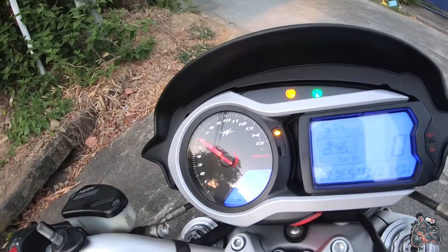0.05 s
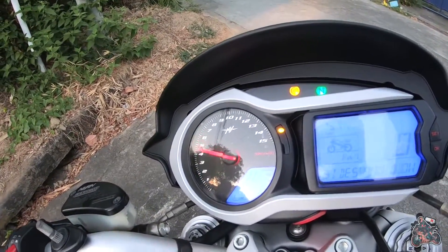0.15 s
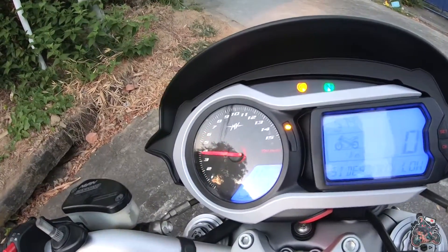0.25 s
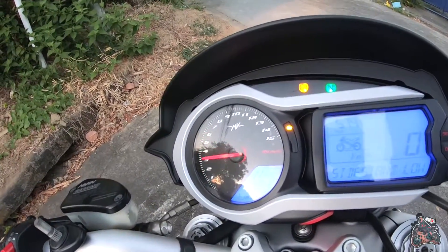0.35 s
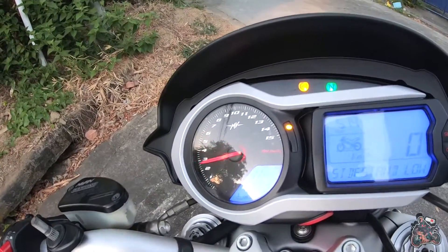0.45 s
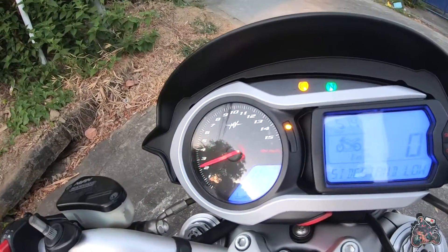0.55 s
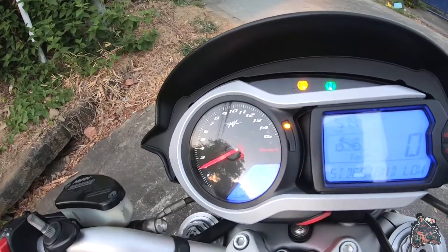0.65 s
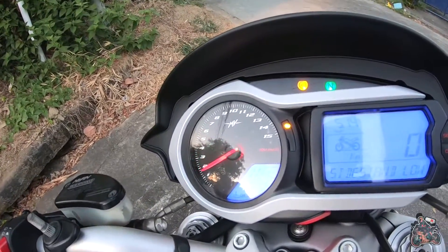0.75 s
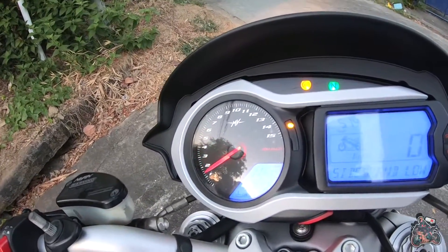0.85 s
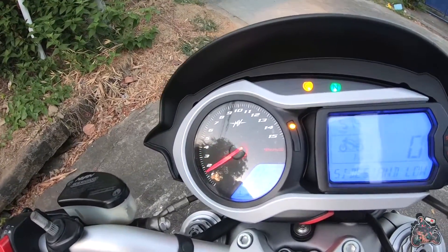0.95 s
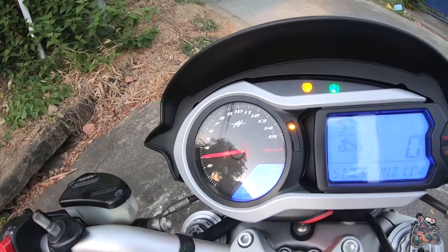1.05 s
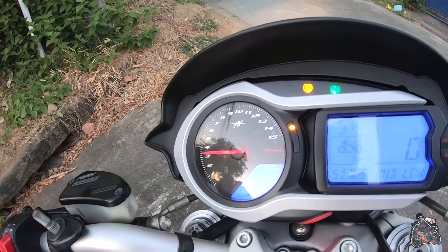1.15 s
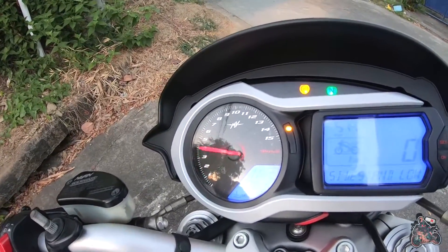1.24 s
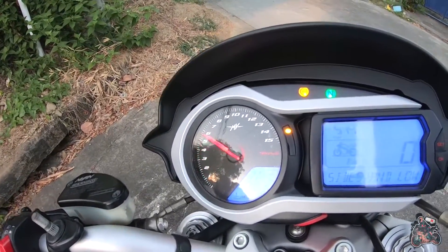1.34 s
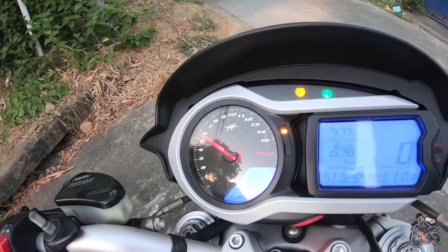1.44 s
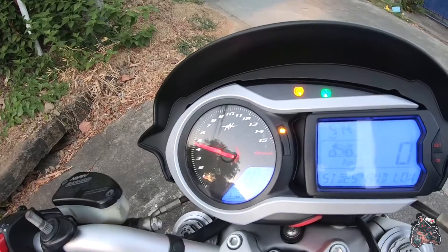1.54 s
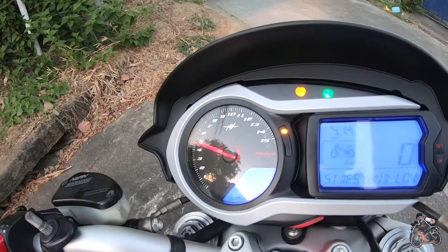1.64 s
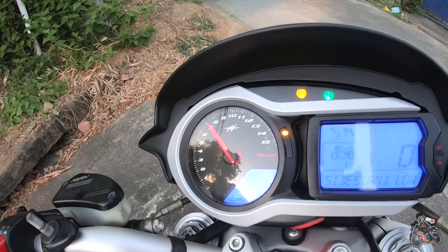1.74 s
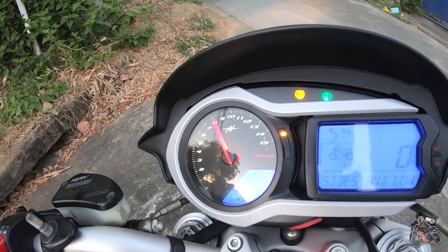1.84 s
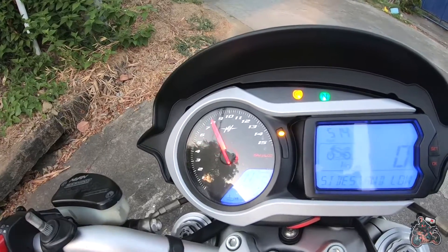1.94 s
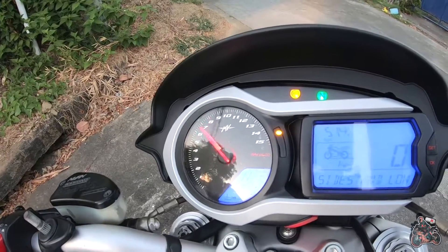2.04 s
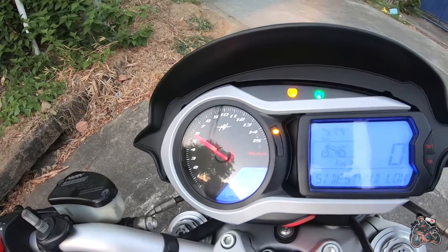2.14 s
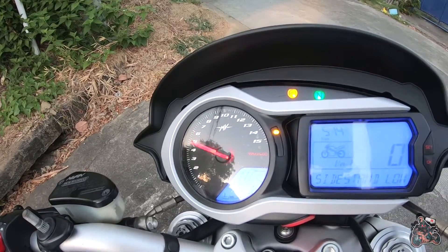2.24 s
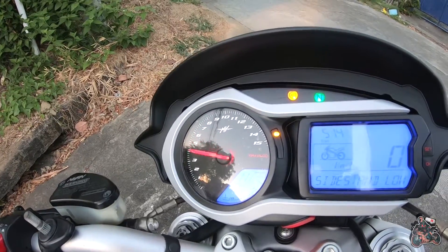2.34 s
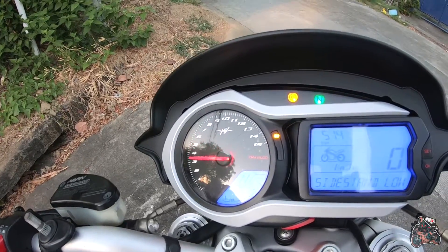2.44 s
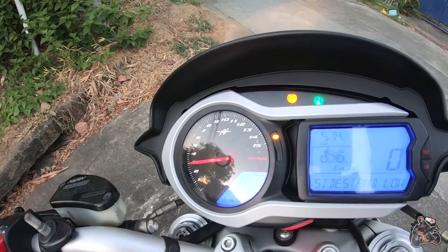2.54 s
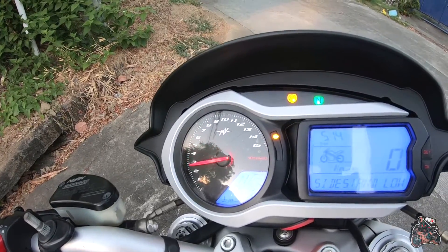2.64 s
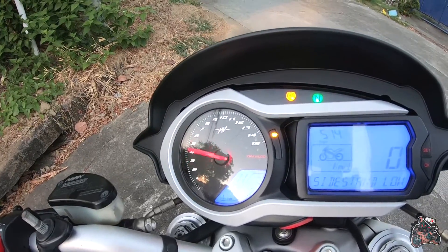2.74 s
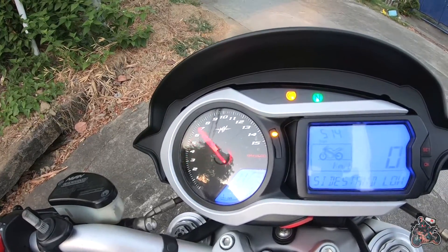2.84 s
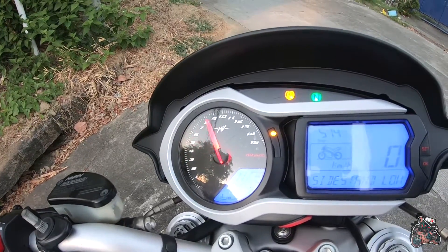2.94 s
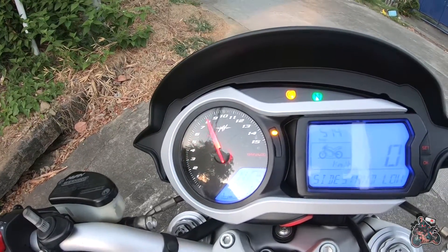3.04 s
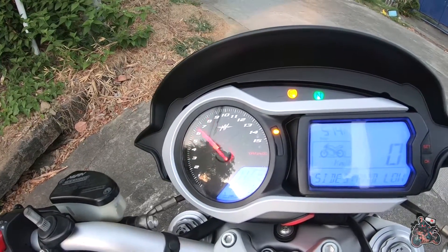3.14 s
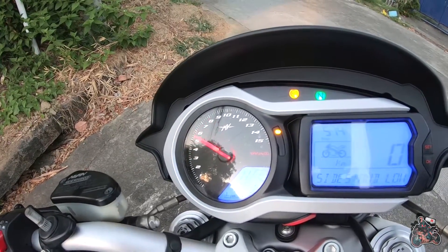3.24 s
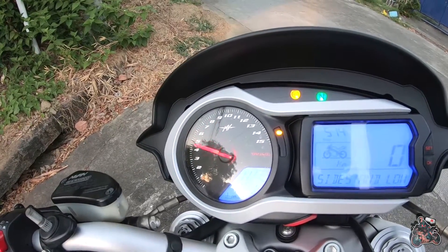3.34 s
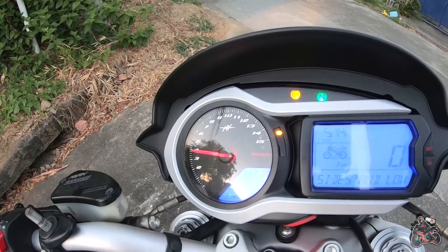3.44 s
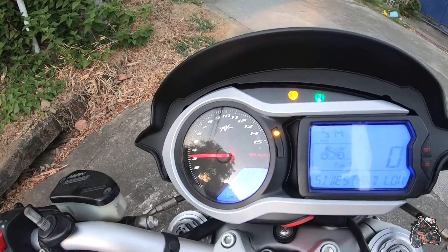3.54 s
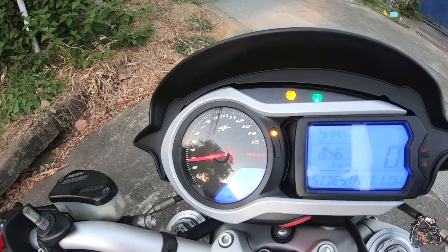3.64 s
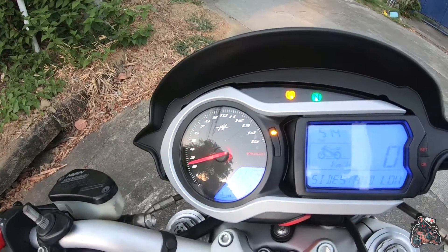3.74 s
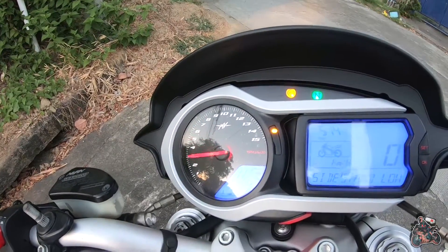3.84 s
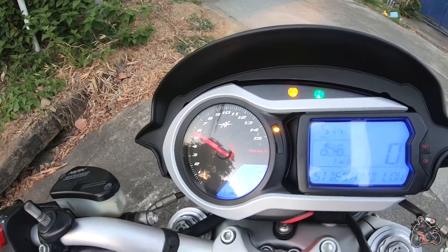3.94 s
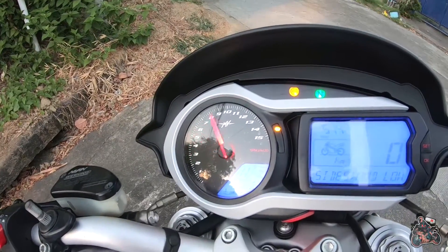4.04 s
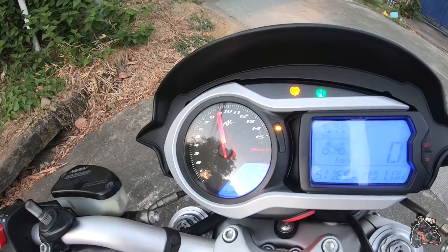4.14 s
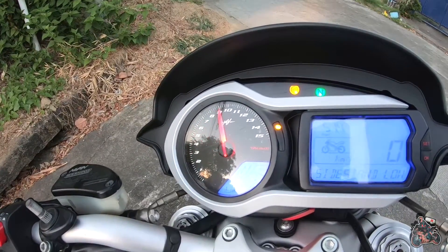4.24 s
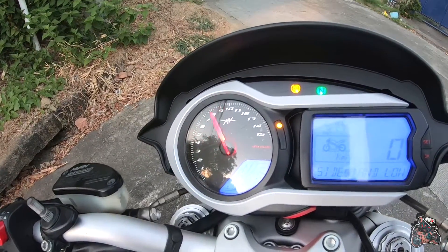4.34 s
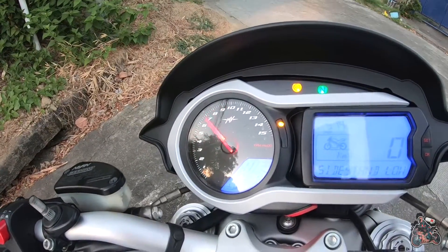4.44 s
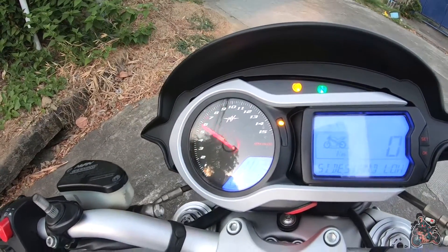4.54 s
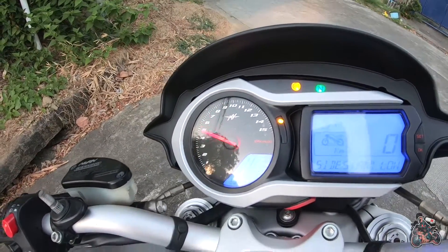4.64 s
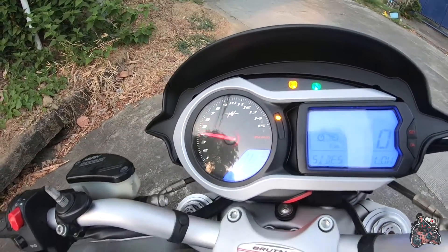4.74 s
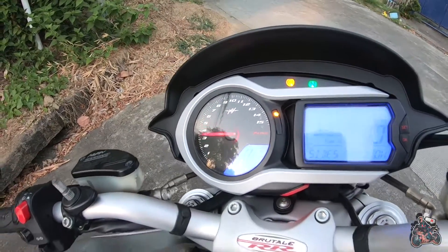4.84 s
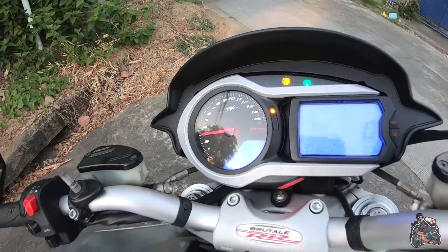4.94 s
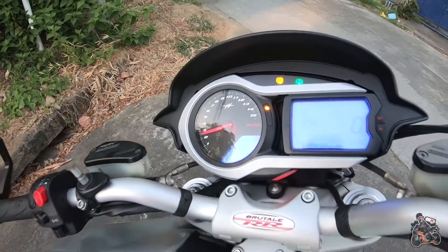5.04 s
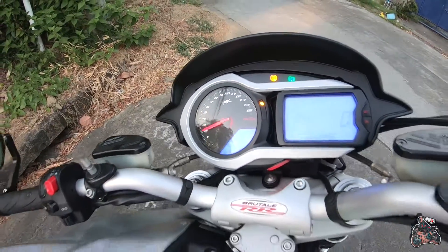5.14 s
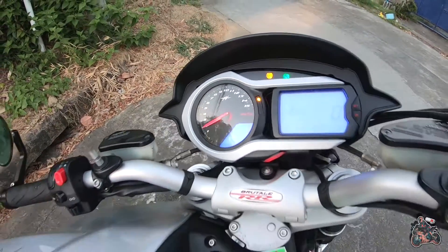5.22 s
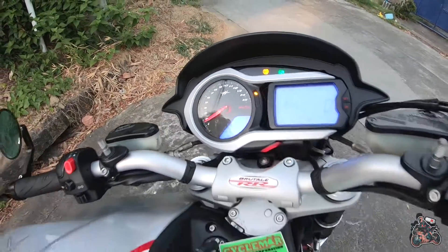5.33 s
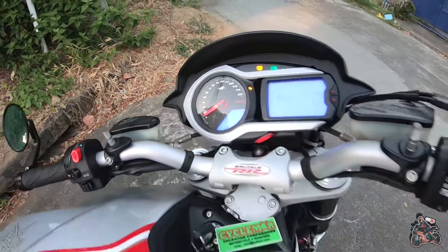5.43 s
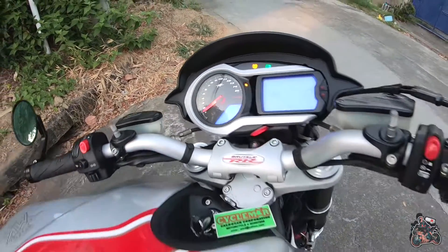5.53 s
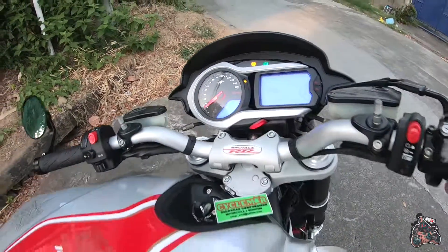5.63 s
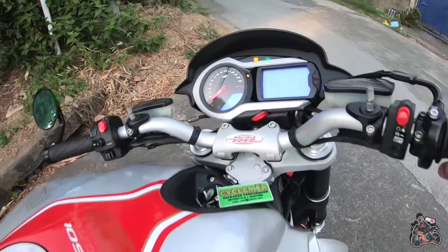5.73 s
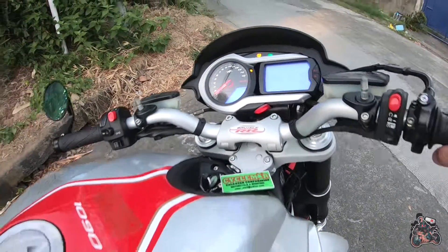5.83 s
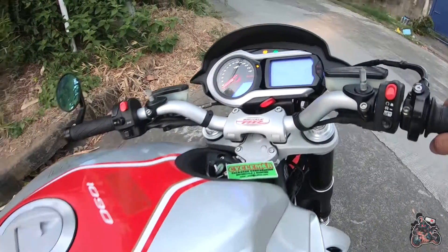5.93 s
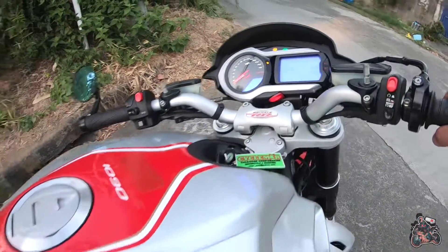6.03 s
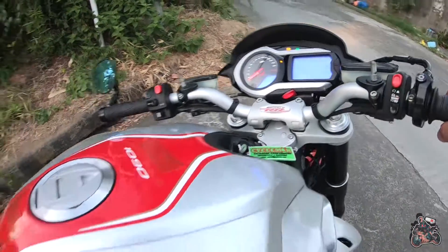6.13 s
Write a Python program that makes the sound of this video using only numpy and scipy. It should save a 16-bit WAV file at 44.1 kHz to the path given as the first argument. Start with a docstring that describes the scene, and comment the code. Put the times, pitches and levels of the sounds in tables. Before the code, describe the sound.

A stationary four-cylinder motorcycle is heard close up from the saddle, outdoors. It starts already coasting down from a rev, gurgling almost to idle by 0.9 seconds. Two quick throttle stabs at about 0.9 and 1.2 seconds step the pitch up, and a bigger rev peaks around 1.7 to 1.9 seconds before falling away. Another high rev climbs at 2.6 seconds and drops from 3. The last and highest rises at 3.8 seconds and holds until about 4.3. Each rev has a booming exhaust bark and a throbbing intake howl, with occasional short spits of air, over chain rattle, hiss and faint gear whine. Soft low burbles dot the descents. The sound widens from near mono after 3 seconds. By about 5.4 seconds the engine settles into a thudding idle with light valve ticking, growing slightly louder until the end just after 6 seconds.

```python
"""Motorcycle revving beside a lane

An inline-four stands still, microphone at the saddle. With each throttle blip the firings boom and bark
in the pipe and gulps of air howl in the airbox; late-burning fuel burbles on the way down. Chain and
gears rattle and whine, and at last the engine settles into a thudding idle with ticking valves."""
import sys
import numpy as np
from scipy import signal
from scipy.fft import rfft, irfft, next_fast_len
from scipy.io import wavfile
from scipy.ndimage import uniform_filter1d, minimum_filter1d, map_coordinates

SR = 44100
rng = np.random.default_rng(int(sys.argv[2]) if len(sys.argv) > 2 else 0)


def persist_wave(psi):
    """Save psi, clipped to +-1, as 16-bit WAV."""
    counts = np.round(np.clip(psi, -1, 1) * 32767).astype(np.int16)
    wavfile.write(sys.argv[1], SR, np.atleast_2d(counts).T)


N = 272538

# throttle blips: (climb start [s], top reached [s], firing rate [Hz], fall start [s], firing rate [Hz])
THROTTLE_BLIPS = [(.92, 1.045, 121, 1.085, 123), (1.177, 1.302, 212, 1.341, 214.5),
                  (1.575, 1.735, 283, 1.923, 285), (2.64, 2.857, 292, 2.988, 289.5),
                  (3.785, 4.006, 301, 4.264, 315)]
# the four cylinders in firing order, at pipe and airbox: (pulse size [ratio], delay [s])
EXHAUST_PUFFS = [(1.5, .0001), (.65, .00065), (1.0, .0003), (.85, .0009)]
INTAKE_GULPS = [(1.7, .0001), (.45, .00036), (1.0, .00018), (.7, .00026)]
# exhaust boom and bark, throttle shut and open: (firing rate [Hz], level [dB])
BOOM_SHUT_LEVELS = [(50, -18.5), (80, -28), (110, -26.5), (140, -17), (165, -18), (205, -15.5), (245, -12),
                    (290, -10.5)]
BOOM_OPEN_LEVELS = [(55, -16), (90, -11), (118, -10), (160, -11), (230, -12), (284, -9), (300, -13)]
BARK_SHUT_LEVELS = [(40, -33), (55, -26), (80, -23.5), (110, -22.5), (150, -19.5), (200, -16), (250, -21.5),
                    (290, -19.5)]
BARK_OPEN_LEVELS = [(45, -19), (100, -12.5), (200, -11.5), (255, -11.5), (285, -20), (310, -23.5)]
# tone colour of each part: (frequency [Hz], relative level [dB])
COASTING_COLOUR = [(25, -45), (60, -20.5), (130, 8), (230, -1.5), (295, 6.5), (370, 5.5), (470, 5),
                   (580, -5.5), (750, -12.5), (1000, -16.5), (1600, -43.5), (3000, -51.5), (8000, -99)]
PULLING_COLOUR = [(25, -39.5), (70, -4.5), (150, 3), (260, 0.5), (370, 6), (510, 4), (680, -0.5), (850, -9),
                  (1100, -21.5), (1600, -14.5), (3000, -37), (8000, -87)]
THUD_COLOUR = [(15, -8), (35, 11), (80, 7), (160, 4.5), (200, -4.5), (240, -10), (290, -5.5), (420, -29),
               (700, -33), (2000, -73)]
AIRBOX_COLOUR = [(200, -46.5), (400, 11.5), (520, -1.5), (800, -0.5), (1060, -1.5), (1230, -14), (1400, 6),
                 (1540, 7.5), (1800, 3), (1950, -4), (2100, -3), (2400, -14.5), (4000, -38), (10000, -52.5)]
CASE_COLOUR = [(150, -35), (400, 6), (700, 5), (1050, -1), (1500, -3.5), (1900, 1), (2400, -3),
               (2900, -5.5), (3600, -9), (4500, -22), (6000, -24.5), (10000, -43)]
VALVE_COLOUR = [(300, -20.5), (700, -8), (1100, -5), (1700, -0.5), (2400, -5), (3000, -5.5), (3500, -8.5),
                (4200, -18), (6000, -24.5), (8000, -30), (11000, -41), (15000, -62.5)]
HISS_COLOUR = [(2000, -24.5), (4000, 5.5), (5000, 0.5), (6200, -2), (7500, -1), (8600, -9.5),
               (10400, -12.5), (11200, -25), (13500, -35), (15000, -48)]
# resonances of silencer chambers and engine cases: (frequency [Hz], bandwidth [Hz], gain [dB])
SILENCER_MODES = [(114, 33, -5.5), (196, 142, -10), (280.8, 37, 2.5), (332, 50, 0.5), (433.5, 44, -3.5),
                  (497, 63, -7.5)]
ENGINE_CASE_MODES = [(1460, 240, -1), (2177, 134, 2.5), (2465, 143, 2.5), (2610, 184, 1), (3410, 400, -10)]
# paths of an idle puff through pipe and silencer: (delay [s], gain [ratio])
PIPE_PATHS = [(.001, 0.67), (.0077, 0.44), (0.012, 1.05), (0.016, 0.04)]
# late burns in the pipe: (time [s], length [s], relative level [dB], pitch [Hz])
LATE_BURNS = [(0.33, 0.089, -15, 59.7), (1.062, 0.08, -8, 85), (1.129, 0.052, -5.5, 62),
              (1.196, 0.21, -14, 81), (1.356, 0.05, -15.5, 61), (1.788, 0.029, -10, 85),
              (1.923, 0.096, -5, 88), (1.982, 0.051, -11, 87), (2.401, 0.065, -8.5, 62),
              (2.533, 0.083, -10, 57), (3.045, 0.057, -13, 84.5), (3.453, 0.11, -12.5, 62),
              (3.628, 0.15, -15.5, 55.6), (4.884, 0.096, -16, 62), (5.046, 0.1, -19, 48)]
# throb of unequal cylinders: (frequency [multiples of the four-stroke cycle], level re howl [dB])
THROB_ORDERS = [(1, -10), (2, -5), (3, -8), (5, -7), (6, -7), (7, -9), (10, -10), (11, -19), (16, -22),
                (17, -21), (19, -14), (21, -11), (23, -19), (25, -20), (27, -22), (28, -20)]
# airbox spits as the throttle snaps: (time [s], relative level [dB])
AIRBOX_SPITS = [(0.3042, -25), (1.1707, -17), (1.236, -21), (1.8717, -11), (1.9183, -10.5), (2.6225, -26.5),
                (2.6451, -17.5), (2.662, -22), (3.8715, -19)]
# gear and chain tones: (frequency [multiples of the firing rate], relative level [dB])
WHINE_ORDERS = [(4, -1), (6, -4), (7, 0), (10, -3), (11, -4)]
# treble at the microphone: (time [s], level [dB])
MIC_TREBLE = [(0, 0), (.5, -3.5), (.85, -3), (1.3, 0.5), (3.7, -1.5), (4.1, 2), (4.18, 5), (4.6, 4),
              (5.4, 4), (6.18, 6)]
# likeness of the noise left and right: (frequency [Hz], correlation [0-1])
MIC_LIKENESS = [(500, 1), (1000, 0.35), (1800, 0.48), (3300, 0.73), (5500, 0), (12000, 0)]
# stereo image: (time [s], width [0-1])
MIC_WIDTH = [(0, 0), (3.0, 0), (3.3, .25), (3.6, .75), (3.85, 1), (6.18, 1)]

START_HZ, IDLE_HZ = 204, 38.6  # firing rates
DRAG_PER_S, SLOW_DRAG_PER_S, KNEE_HZ = 1.664, 2.2, 120  # the flywheel slows faster below the knee
OPEN_LEAD_FIRINGS, SHUT_LEAD_S, OPENING_S, SHUTTING_S = 2.5, 0.065, 0.052, 0.12  # throttle timing
THIN_S, THIN_HALF_S, THIN_DB = 4.185, 0.039, -24.5  # the boom dips briefly atop the highest rev
# levels that follow speed: (level at REFERENCE_HZ [dB], slope [dB/octave])
HOWL_SHUT_DB, HOWL_OPEN_DB = (-27, 9.5), (-16.5, 6.5)
CLATTER_DB, HISS_DB, WHINE_DB = (-27, 4), (-41, 5.5), (-42.5, 4.5)
REFERENCE_HZ = 300
KNOCK_DB, HISS_OPEN_DB = 7, 1  # added by an open throttle
THUD_DB, TICK_DB, IDLE_FADE_DB_PER_OCTAVE = -22.5, -45, 13.5
BARK_SHADE, BOOM_SHADE = 0.49, 0.27  # dB lost for each dB of treble at the microphone
APPROACH_S, APPROACH_DB_PER_S = 5.4, 7  # the microphone draws back over the tank, nearer the engine
CEILING_DB, TOP_HZ = -2, 15100


def exhaust_boom(turns, hz, opening):
    """The firing note, nearly a sine: a hard pull steepens it, and it dies out near idle."""
    phase = 2 * np.pi * turns + 0.21 * wobble(90)
    pull = ramp(np.gradient(hz) * SR / 1100)
    wave = np.sin(phase) + (0.12 + 0.22 * pull) * np.cos(2 * phase)
    running = ramp((hz - 41) / 8)
    level_db = blend(along(BOOM_SHUT_LEVELS, hz), along(BOOM_OPEN_LEVELS, hz), opening)
    thin_db = THIN_DB * np.exp(-((np.arange(N) / SR - THIN_S) / THIN_HALF_S) ** 2)
    ragged_db = 1.5 * (1 - opening) * ramp((150 - hz) / 40) * wobble(25)
    return np.sqrt(2) * wave * running * amp(level_db + thin_db + ragged_db + 1.47 * wobble(70))


def exhaust_bark(turns, hz, opening):
    """Puffs ring the pipe: lopsided coasting, even and bright under load, gurgling at low speed."""
    lopsided = steady(pulses(turns, EXHAUST_PUFFS, scatter=.13, jitter_s=.00003))
    even = steady(pulses(turns, [(1, .0004)], scatter=.1, jitter_s=.00003))
    gas = rng.standard_normal(N) * gusts(turns, sharpness=.5)
    load = engine_load(hz)
    surge = np.clip(np.gradient(hz) * SR / 900, 0, .7)
    coasting = steady(ring(lopsided + .33 * gas, COASTING_COLOUR))
    blast = ring(blend(lopsided, even, surge) + .36 * gas, PULLING_COLOUR)
    driving = steady(blast + resonate(blast, [(485, 41, 0.89)]))  # the collector's resonance
    ragged = steady(pulses(turns, EXHAUST_PUFFS, scatter=.5, jitter_s=.0005)) + .95 * gas
    chambers = resonate(ragged, SILENCER_MODES)
    gurgle = steady(ring(chambers, [(60, 3.5), (480, -6.5), (700, -9.5), (2000, -35)]))
    stumble = ramp((155 - hz) / 55) * (1 - .7 * load * ramp((hz - 60) / 40))
    pipe = steady(blend(blend(coasting, driving, load), gurgle, stumble))
    rumble = amp(-16) * unit(ring(gas, [(20, -49.5), (45, 18), (90, 12), (150, 17), (300, -47)]))
    level_db = blend(along(BARK_SHUT_LEVELS, hz), along(BARK_OPEN_LEVELS, hz), opening)
    return amp(level_db + 1.7 * stumble * wobble(30)) * (pipe + rumble)


def idle_thuds(turns, hz):
    """Each slow puff thuds out of the silencer, followed by its reflections in the pipe."""
    firings = pulses(turns, [(1.04, .00015), (.96, .0003)], scatter=.08, jitter_s=.0002)
    puffs = ring(firings, THUD_COLOUR)
    paths = lambda f: sum(gain * np.exp(-2j * np.pi * f * delay) for delay, gain in PIPE_PATHS)
    thuds = low_cut(filtered(puffs, paths), hz=26, order=4)
    return amp(THUD_DB) * idle_gain(hz) * steady(thuds)


def burbles():
    """Unburnt fuel lights late and swells the pipe's lowest resonance."""
    t, out = np.arange(N) / SR, np.zeros(N)
    for middle, length, db, hz in LATE_BURNS:
        near = np.abs(t - middle) < 2 * length
        offset = t[near] - middle
        swell = amp(db - 2.5) * np.exp(-(3.4 * offset / length) ** 2)
        out[near] += swell * np.sin(2 * np.pi * (hz * offset + rng.random()))
    return out


def airbox_howl(turns, hz, opening):
    """Each gulp of air rings the airbox; high in the revs the unequal cylinders add a throb."""
    gulps = steady(ring(pulses(turns, INTAKE_GULPS, scatter=.1, jitter_s=.000014), AIRBOX_COLOUR))
    air = steady(ring(rng.standard_normal(N) * gusts(turns, sharpness=0.24), AIRBOX_COLOUR))
    level_db = blend(with_speed(HOWL_SHUT_DB, hz), with_speed(HOWL_OPEN_DB, hz), opening)
    strength = ramp((level_db + 36) / 11)
    howl = (.5 + .2 * strength) * gulps + .33 * air
    throb = np.zeros(N)
    for order, db in THROB_ORDERS:
        tone = np.sqrt(2) * np.sin(2 * np.pi * (order * turns / 4 + rng.random()))
        throb += tone * amp(db + 3.1 * wobble(28))
    screaming = strength * ramp((hz - 245) / 35)
    return amp(level_db) * (howl + screaming * throb)


def airbox_spits():
    """Short bursts of air crack through the airbox."""
    t, out = np.arange(SR // 25) / SR, np.zeros(N)
    for start, db in AIRBOX_SPITS:
        out[round(start * SR):][:len(t)] += amp(db + 6 - 60 * t / 0.11) * rng.standard_normal(len(t))
    return ring(out, AIRBOX_COLOUR)


def engine_clatter(turns, hz, opening, treble_db):
    """Chain and gears rattle the cases in time with the shaft; air hisses, and valves tick at idle."""
    knock_db = KNOCK_DB * opening * ramp((250 - hz) / 130)
    clatter_db = with_speed(CLATTER_DB, hz) + knock_db + 0.22 * treble_db
    hiss_db = with_speed(HISS_DB, hz) + HISS_OPEN_DB * opening + treble_db + .8 * wobble(16)
    rattle = unit(gusts(turns, sharpness=0.032) * amp(1.2 * wobble(500)))
    shaking = stereo_noise([(500, 1), (2400, 8.5), (9000, -21.5)])
    ringing = unit(resonate(shaking, ENGINE_CASE_MODES)) * ramp((hz - 25) / 25)
    cases = 1.023 * stereo_noise(CASE_COLOUR) + 0.58 * ringing
    clatter = amp(clatter_db) * cases * amp([[-1.8], [1.6]])
    hiss = amp(hiss_db) * stereo_noise(HISS_COLOUR) * amp([[-1.2], [1.2]])
    beats = unit(gusts(turns, sharpness=1.0) * amp(2.5 * wobble(220)))
    ticks = amp(TICK_DB + treble_db) * idle_gain(hz) * beats * stereo_noise(VALVE_COLOUR)
    return rattle * (clatter + hiss) + ticks


def gear_whine(turns, hz):
    """Meshing teeth sing faintly on multiples of the shaft speed."""
    tones = sum(amp(db + 3.6 * wobble(20)) * np.sin(2 * np.pi * order * turns + .5 * wobble(50))
                for order, db in WHINE_ORDERS)
    return np.sqrt(2) * amp(with_speed(WHINE_DB, hz)) * tones


def roadside_echo(x, t60):
    """Tank, road and verge scatter a short echo, opposite in polarity left and right."""
    t = np.arange(SR // 5) / SR
    tail = rng.standard_normal(len(t)) * amp(-60 * t / t60) * (t > .002)
    echo = signal.fftconvolve(x, tail / np.linalg.norm(tail))[:N]
    return np.array([echo, -echo])


def firing_rate():
    """Firings a second: each blip climbs, hangs and coasts down; the flywheel rounds the corners."""
    t = np.arange(N) / SR
    hz = coast(START_HZ, t)
    for start, top, top_hz, fall, fall_hz in THROTTLE_BLIPS:
        driven = np.interp(t, [start, top, fall], [np.interp(start, t, hz), top_hz, fall_hz])
        blip = np.where(t < fall, driven, coast(fall_hz, t - fall))
        hz = np.where(t < start, hz, blip)
    return smooth(hz, size=1540) * (1 + 0.001492 * wobble(24.99))


def coast(from_hz, since_s):
    """Drag slows the flywheel exponentially until the idle catches it."""
    hz = from_hz * np.exp(-DRAG_PER_S * since_s)
    knee = min(from_hz, KNEE_HZ)
    below_knee = knee * (hz / knee) ** (SLOW_DRAG_PER_S / DRAG_PER_S)
    return np.maximum(np.minimum(hz, below_knee), IDLE_HZ)


def throttle(hz):
    """Throttle opening, 0-1: it moves a little before the speed answers."""
    t, opening = np.arange(N) / SR, np.zeros(N)
    for start, _, _, fall, _ in THROTTLE_BLIPS:
        opens = start - OPEN_LEAD_FIRINGS / np.interp(start, t, hz)
        shuts = fall - SHUT_LEAD_S
        opening += ramp((t - opens) / OPENING_S) * ramp(1 - (t - shuts) / SHUTTING_S)
    return np.minimum(opening, 1)


def engine_load(hz):
    """Effort, 0-1, of speeding up the flywheel and beating friction."""
    climb = np.gradient(uniform_filter1d(np.log(hz), size=1800)) * SR
    return ramp((climb + 0.62) / 2.2)


def pulses(turns, cylinders, scatter, jitter_s):
    """One pulse per firing: each cylinder has its own size and delay, and no two burns are alike."""
    firing = np.arange(1, int(turns[-1]))
    size, delay = np.array(cylinders)[firing % len(cylinders)].T
    timing, strength = rng.standard_normal((len(firing), 2)).T
    at = np.interp(firing, turns, np.arange(N)) + SR * (delay + jitter_s * timing)
    taps = np.floor(at)[:, None] + np.arange(-7, 9)
    offset = taps - at[:, None]
    shape = np.sinc(offset) * np.sinc(offset / 8)  # lets a pulse fall between samples
    weights = (size * np.exp(scatter * strength))[:, None] * shape
    return np.bincount(np.clip(taps, 0, N).astype(int).ravel(), weights.ravel(), N + 1)[:N]


def gusts(turns, sharpness):
    """An envelope of rms 1 that swells once per firing."""
    return unit(np.exp(sharpness * np.cos(2 * np.pi * (turns - 1 / 4))))


def with_speed(law, hz):
    """Level in dB that grows by a set step with each octave of speed."""
    db, db_per_octave = law
    return db + db_per_octave * np.log2(hz / REFERENCE_HZ)


def idle_gain(hz):
    """Gain that is 1 at idle and fades with speed."""
    return amp(-IDLE_FADE_DB_PER_OCTAVE * np.log2(hz / IDLE_HZ))


def stereo_noise(colour):
    """Coloured noise of rms 1, less alike left and right towards the treble."""
    def response(hz):
        angle = np.arccos(np.clip(along(MIC_LIKENESS, hz), -1, 1)) / 2
        return amp(along(colour, hz)) * [np.cos(angle), np.sin(angle)]
    mid, side = filtered(rng.standard_normal((2, N)), response)
    return unit(np.array([mid + side, mid - side]))


def ring(x, colour, size=8192):
    """x rings a minimum-phase body of the given colour."""
    cepstrum = irfft(np.log(amp(along(colour, np.fft.rfftfreq(size, 1 / SR)))))
    cepstrum[1:size // 2] *= 2
    cepstrum[size // 2 + 1:] = 0
    return signal.fftconvolve(x, irfft(np.exp(rfft(cepstrum))))[:N]


def resonate(x, modes):
    """x rings a set of resonances of alternating polarity."""
    return filtered(x, lambda f: sum(
        (-1) ** k * amp(db) * 1j * f * width / (centre ** 2 - f ** 2 + 1j * f * width)
        for k, (centre, width, db) in enumerate(modes)))


def low_cut(x, hz, order):
    """x rolled off below hz."""
    return filtered(x, lambda f: 1 - np.exp(-(f / hz) ** order))


def filtered(x, response):
    """x through a frequency response."""
    size = next_fast_len(N + SR // 2)
    return irfft(rfft(x, size) * response(np.fft.rfftfreq(size, 1 / SR)), size)[..., :N]


def along(points, hz):
    """(frequency, value) points joined on a log axis."""
    freqs, values = np.transpose(points)
    return np.interp(np.log(hz + 1), np.log(freqs + 1), values)


def over_time(points):
    """(time, value) points joined sample by sample."""
    return np.interp(np.arange(N) / SR, *np.transpose(points))


def wobble(rate):
    """A smooth random curve, rate knots a second."""
    return map_coordinates(rng.standard_normal(int(N * rate / SR) + 4), [np.arange(N) * rate / SR])


def smooth(x, size):
    """x averaged twice over size samples."""
    return uniform_filter1d(uniform_filter1d(x, size), size)


def steady(x):
    """x with its slow level held at rms 1."""
    return x / np.sqrt(np.abs(smooth(x * x, size=2400)) + 1e-12)


def unit(x):
    """x scaled to rms 1."""
    return x / np.sqrt(np.mean(x ** 2) + 1e-20)


def blend(a, b, share):
    """Crossfade from a to b."""
    return a + share * (b - a)


def ramp(x):
    """x held within 0-1."""
    return np.clip(x, 0, 1)


def amp(db):
    """Decibels to gain."""
    return 10 ** (np.asarray(db) / 20)


def scene():
    """From the saddle: exhaust a touch left, airbox a little right, all driven by one crankshaft."""
    hz = firing_rate()
    opening = throttle(hz)
    turns = np.cumsum(hz) / SR  # firings so far
    treble_db = over_time(MIC_TREBLE)
    boom = amp(-BOOM_SHADE * treble_db) * exhaust_boom(turns, hz, opening)
    lows = boom + idle_thuds(turns, hz) + burbles()
    bark = amp(-BARK_SHADE * treble_db) * exhaust_bark(turns, hz, opening)
    airbox = airbox_howl(turns, hz, opening) + airbox_spits()
    bright = low_cut(airbox, hz=900, order=2)
    echo = roadside_echo(amp(-28) * lows + amp(-18) * bark + amp(-9) * bright, t60=.06)
    direct = (lows + bark) * amp([[.2], [-.2]]) + airbox * amp([[-.9], [.9]])
    machinery = engine_clatter(turns, hz, opening, treble_db) + gear_whine(turns, hz)
    closer = amp(APPROACH_DB_PER_S * np.maximum(np.arange(N) / SR - APPROACH_S, 0))
    return closer * (direct + echo + machinery)


def record(dry):
    """The microphone's image opens from near mono; a limiter ducks the peaks, and the top is cut."""
    mid, side = (dry[0] + dry[1]) / 2, (dry[0] - dry[1]) / 2
    side = blend(0.036 * low_cut(side, hz=3000, order=4), side, over_time(MIC_WIDTH))
    stereo = np.array([mid + side, mid - side])
    needed_gain = np.minimum(1, amp(CEILING_DB) / (np.abs(stereo).max(axis=0) + 1e-9))
    limiter_gain = uniform_filter1d(minimum_filter1d(needed_gain, size=1100), size=700)
    return filtered(stereo * limiter_gain, lambda hz: hz < TOP_HZ)


dry = scene()
out = record(dry)
persist_wave(out)
```